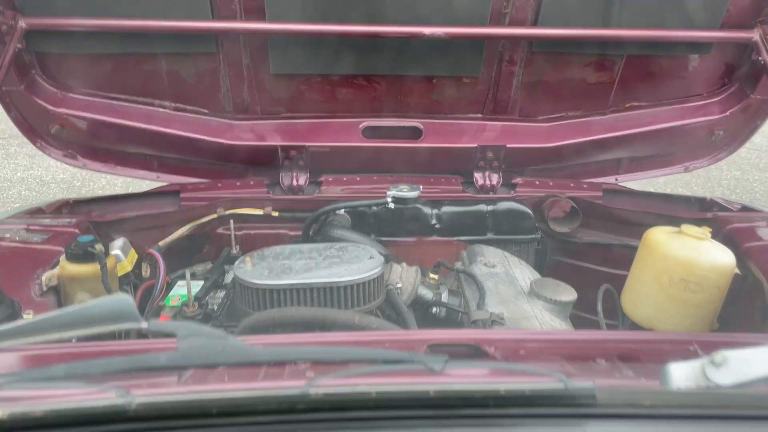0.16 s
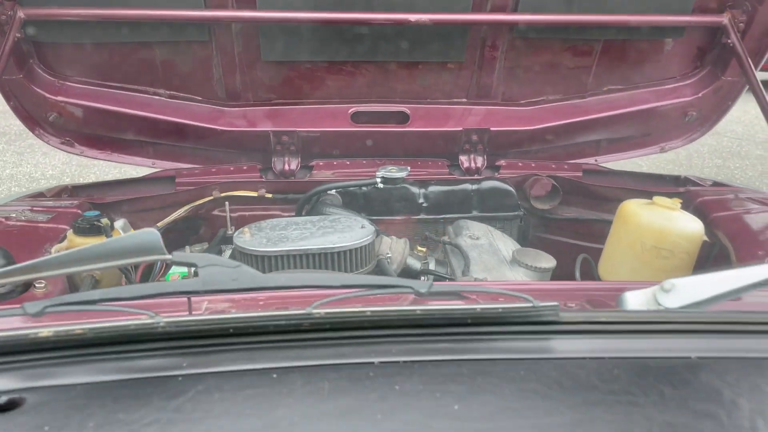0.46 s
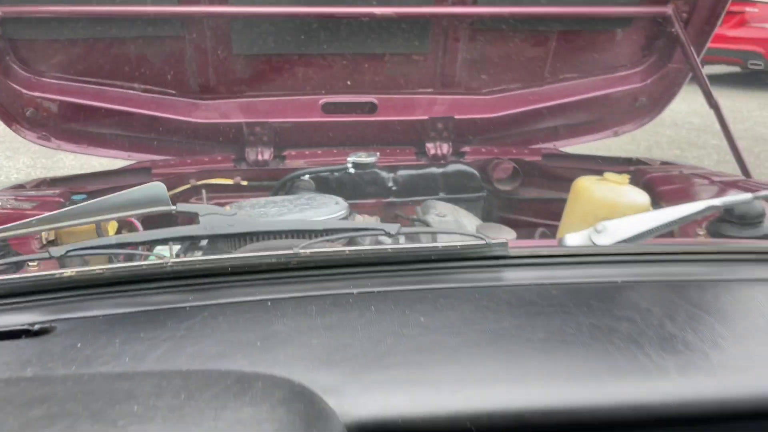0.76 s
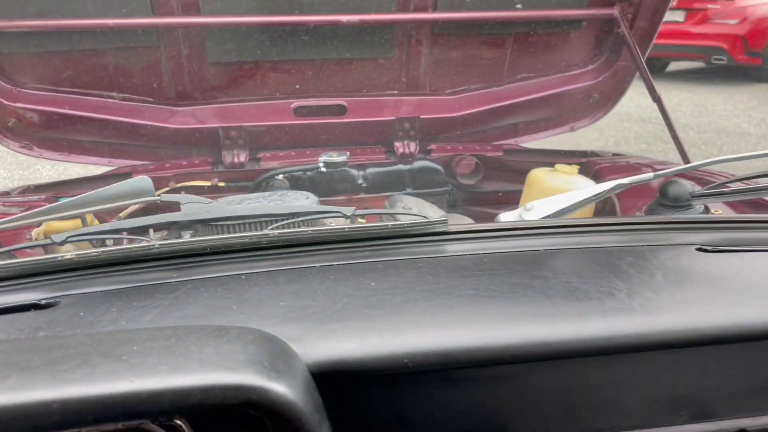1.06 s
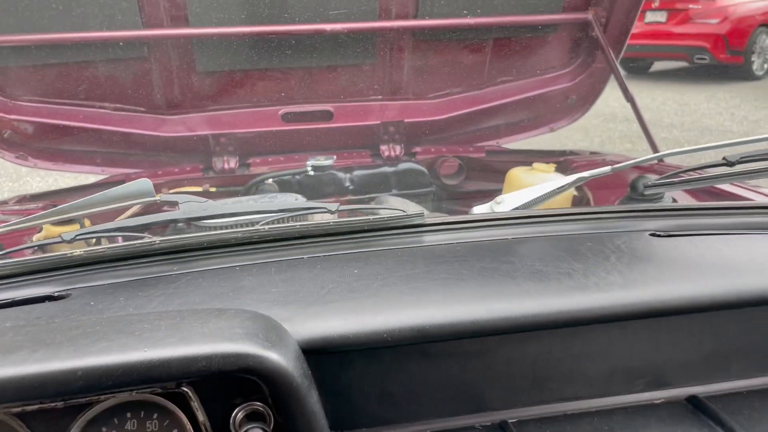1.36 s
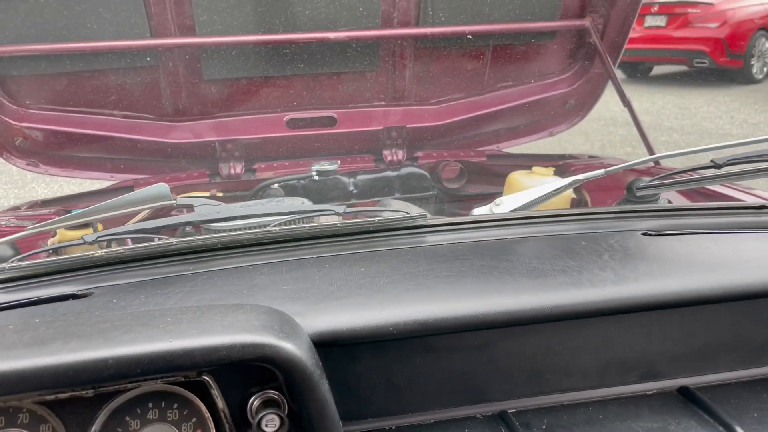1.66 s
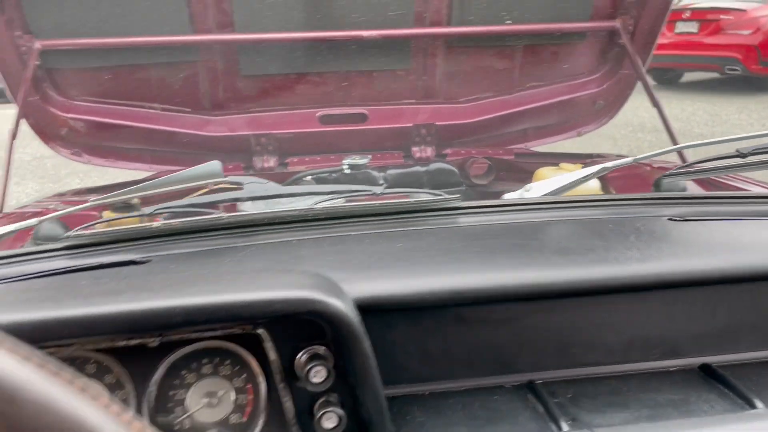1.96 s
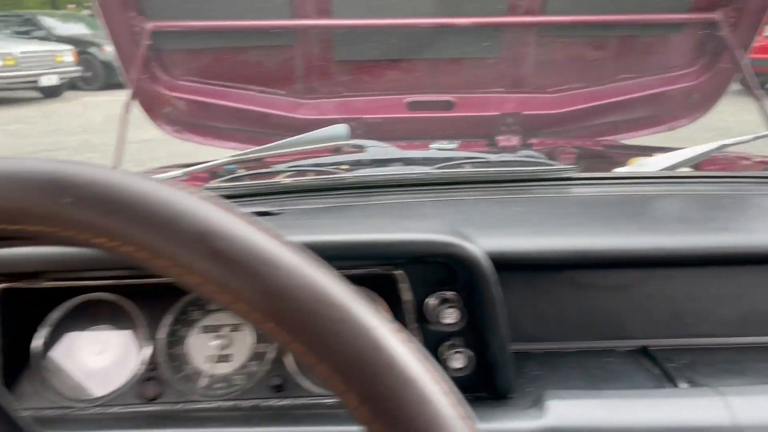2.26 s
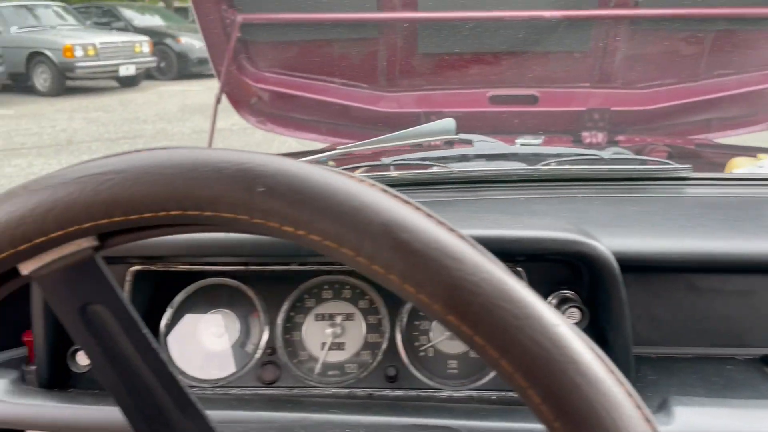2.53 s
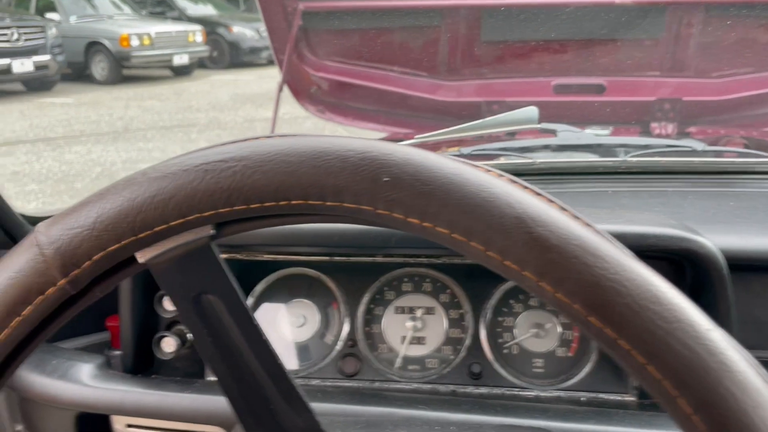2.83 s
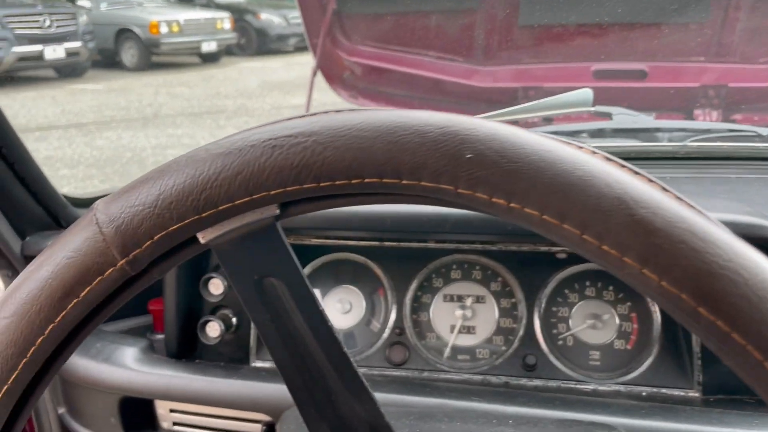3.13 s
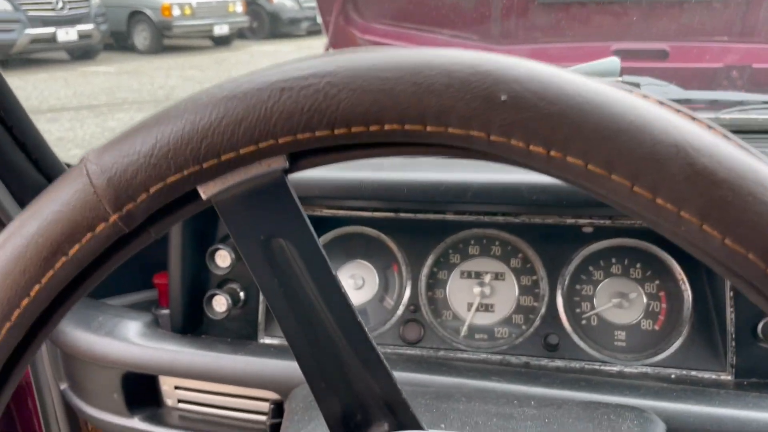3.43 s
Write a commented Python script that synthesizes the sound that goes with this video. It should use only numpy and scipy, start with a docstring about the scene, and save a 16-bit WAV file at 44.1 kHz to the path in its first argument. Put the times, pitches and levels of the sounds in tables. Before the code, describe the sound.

A four-cylinder car engine idles throughout, about 25 firings a second, its deep boom near 76 Hz swelling and dipping unevenly over steady low hum. Quieter fan and intake whirr and light valve taps sit above. Faint high metallic chinks fall at 0.1, 0.7, 2.6 and 2.8 s. Tone shifts from 0.6 to 2.8 s as the phone moves in the cabin; a low thump at 3.3 s, then slightly brighter hiss.

```python
"""A four-cylinder engine idles with its bonnet open, heard by a phone that moves in the driver's seat.
From the start, tones at multiples of the firing rate hum, uneven firings ring the exhaust and cabin, steady
tones beat against them, and fan, intake and valve gear whirr and tap; faint chinks fall at 0.07 and 0.67 s.
From 0.6 to 2.8 s the phone passes from dash top to wheel, so the balance of tones and resonances shifts;
two more chinks come at 2.57 and 2.80 s, a heavy firing thumps at 3.27 s, then the treble of the whirr rises."""
import sys
import numpy as np
from scipy import signal
from scipy.fft import rfft, irfft, next_fast_len
from scipy.io import wavfile
from scipy.ndimage import uniform_filter1d

SR = 44100
rng = np.random.default_rng(int(sys.argv[2]) if len(sys.argv) > 2 else 0)


def to_wav(s):
    """Save 16-bit WAV."""
    ch = np.atleast_2d(s).T  # columns
    pcm = np.round(np.clip(ch, -1, 1) * 32767)  # PCM
    wavfile.write(sys.argv[1], SR, pcm.astype(np.int16))


N = 158319


def undb(db):
    """dB to gain."""
    return 10 ** (np.asarray(db) / 20)


def level(x, rms_db):
    """Scales x to an rms level."""
    return x * undb(rms_db) / np.sqrt(np.mean(x ** 2))


def curve(table, col=1):
    """A table column as a line over time."""
    rows = np.array(table, float)
    return np.interp(np.arange(N) / SR, rows[:, 0], rows[:, col])


def on_log(hz, table, col=1):
    """A table column read on a log-frequency axis."""
    rows = np.array(table, float)
    return np.interp(np.log(np.maximum(hz, 1)), np.log(rows[:, 0]), rows[:, col])


def walk(rate_hz):
    """Random levels held 1 / rate_hz s and slewed twice; spread near 1."""
    hold = int(SR / rate_hz)
    steps = np.repeat(rng.standard_normal(N // hold + 1), hold)
    return 1.583 * uniform_filter1d(uniform_filter1d(steps, hold), hold)[:N]


def resonate(x, hz, width_hz):
    """A resonance applied twice."""
    b, a = signal.iirpeak(hz, hz / width_hz, fs=SR)
    return signal.lfilter(b, a, signal.lfilter(b, a, x))


# Times at which the phone is at dash top, mid-way and wheel: (time [s])
PHONE_PLACES_S = [.6, 1.5, 2.8]


def fading(dash_db, wheel_db):
    """A level that passes in dB from the phone's first place to its last."""
    return np.interp(np.arange(N) / SR, PHONE_PLACES_S[::2], [dash_db, wheel_db])


# Idle speed: (time [s], firing rate [Hz])
FIRING_RATE = [(0.15, 25.27), (0.33, 25.74), (0.51, 25.19), (0.69, 25.16), (0.87, 25.51), (1.05, 25.12),
               (1.23, 24.74), (1.41, 25.02), (1.59, 25.66), (1.77, 25.1), (1.95, 25.55), (2.13, 25.49),
               (2.31, 25.27), (2.49, 25.26), (2.67, 25.48), (2.85, 26.03), (3.03, 25.62), (3.21, 25.51),
               (3.39, 25.56)]


def firing_count():
    """Firings since the start: the integral of the firing rate."""
    return np.cumsum(curve(FIRING_RATE)) / SR


# Cabin boom on the third order: (time [s], level [dB rms])
CABIN_BOOM = [(0.05, -20), (0.11, -22), (0.17, -28), (0.25, -22), (0.4, -26), (0.45, -34), (0.51, -23),
              (0.54, -20), (0.63, -26), (0.7, -23), (0.89, -25), (0.96, -37), (0.99, -27), (1.03, -23),
              (1.11, -25), (1.18, -22), (1.26, -24), (1.36, -19), (1.46, -22), (1.53, -28), (1.6, -40),
              (1.64, -29), (1.68, -26), (1.75, -29), (1.83, -23), (2.03, -26), (2.05, -28), (2.09, -40),
              (2.13, -31), (2.29, -28), (2.35, -31), (2.4, -23), (2.45, -23), (2.55, -34), (2.7, -24),
              (2.81, -27), (2.86, -31), (2.9, -43), (2.93, -30), (2.97, -28), (3.05, -38), (3.12, -28),
              (3.25, -24), (3.32, -33), (3.38, -25), (3.48, -29), (3.52, -37), (3.58, -31)]
# Firing orders: (multiple of firing rate, level at dash top [dB rms], level at wheel [dB rms])
FIRING_ORDERS = [(1, -40, -39), (1.5, -51, -61), (2, -38, -37), (2.25, -47, -54), (2.75, -47, -47),
                 (3.5, -52, -57), (4, -42, -46), (4.5, -45, -53), (5, -47, -44), (5.25, -49, -55),
                 (6, -52, -58), (7, -49, -48), (8, -63, -61), (10, -58, -64), (11, -59, -63)]
BOOM_DRAG, BOOM_WANDER_RAD, ORDER_WAVER_DB = 1, .08, 1.3


def orders(firings):
    """Tones locked to the firings; the cabin, tuned just under the third, pulls its swells flat."""
    swell = undb(curve(CABIN_BOOM))
    # Hilbert phase: pitch sags while loud, slips ahead at each dip
    log_swell = np.pad(np.log(swell), N // 2, "reflect")
    drag = -BOOM_DRAG * signal.hilbert(log_swell).imag[N // 2:][:N]
    phase = 2 * np.pi * 3 * firings + drag + BOOM_WANDER_RAD * walk(6)
    out = np.sqrt(2) * swell * np.sin(phase)
    for multiple, dash_db, wheel_db in FIRING_ORDERS:
        gain = undb(fading(dash_db, wheel_db) + ORDER_WAVER_DB * walk(8.8))
        out = out + np.sqrt(2) * gain * np.sin(2 * np.pi * (multiple * firings + rng.random()))
    return out


# Exhaust and cabin resonances: (frequency [Hz], width [Hz], level [dB rms])
PIPE_CABIN_RINGS = [(46.5, 4.4, -40), (87.6, 29, -48.5), (101.2, 15, -50.5), (138.7, 26, -48),
                    (163, 15, -60.5)]


def uneven_firings(firings):
    """Each firing is stronger or weaker than the mean; the unevenness rings pipe and cabin."""
    strength = rng.uniform(-1, 1, 200)[firings.astype(int)]
    pulses = np.diff(np.floor(firings), prepend=0) * strength
    return sum(level(resonate(pulses, hz, width_hz), db) for hz, width_hz, db in PIPE_CABIN_RINGS)


THUMP_S, THUMP_PEAK_DB, THUMP_HZ, THUMP_WIDTH_S = 3.27, -23.5, 50, .04  # width: centre to 1/e


def thump():
    """One heavy firing: a low tone under a Gaussian envelope."""
    late = np.arange(N) / SR - THUMP_S
    envelope = undb(THUMP_PEAK_DB) * np.exp(-(late / THUMP_WIDTH_S) ** 2)
    return envelope * np.cos(2 * np.pi * THUMP_HZ * late)


# Steady hum, perhaps a pump: (frequency [Hz], level at dash top [dB rms], level at wheel [dB rms])
STEADY_HUM = [(45, -45, -42), (90, -49, -52), (134, -53, -56), (355.5, -57, -68)]
HUM_WAVER_DB = 1.0


def hum():
    """Tones of fixed pitch that do not follow the engine; their levels waver."""
    t = np.arange(N) / SR
    out = 0
    for hz, dash_db, wheel_db in STEADY_HUM:
        gain = undb(fading(dash_db, wheel_db) + HUM_WAVER_DB * walk(2))
        out = out + np.sqrt(2) * gain * np.sin(2 * np.pi * hz * t)
    return out


# Whirr common to both ports, shape before overall scaling: (frequency [Hz], relative density [dB])
WHIRR_MID = [(120, -13), (200, 0.5), (306, -8), (347, -7), (421, -8.5), (477, -10), (657, -19), (1020, -18),
             (1270, -21.5), (2040, -21.5), (2580, -27), (5620, -36), (7210, -46), (10500, -35),
             (13900, -52)]
# Whirr difference between the ports, likewise: (frequency [Hz], relative density [dB])
WHIRR_DIFFERENCE = [(88, -45), (150, -3), (181, -0.5), (211, -4.5), (308, -14.5), (468, -9), (587, -19),
                    (1460, -17), (2210, -31), (4460, -39), (7720, -34.5), (9880, -40.5), (10900, -63),
                    (12200, -54.5), (13900, -37)]
# Shares of the difference: (frequency [Hz], share leaning left [-], share lagging between ports [-])
PORT_SHARES = [(147, .5, .5), (250, 0.2, 0.62), (500, 0.36, 0.73), (1000, 0.054, 0.6), (2000, 0.1, 0.31),
               (4000, 0.33, 0.66), (7900, .02, .75), (13000, .02, 0.66)]
# Whirr as the phone turns, used about each column's mean: (time [s], level at 150-400 Hz [dB],
# 400-900 Hz [dB], 900-3000 Hz [dB], 3000-7000 Hz [dB], above [dB])
PHONE_TURN = [(0.05, -43, -48.5, -51, -61.5, -68.5), (0.18, -41, -50, -56, -63.5, -67),
              (0.31, -44.5, -51.5, -54.5, -64, -71.5), (1.75, -46, -55, -56, -66, -73.5),
              (2.18, -47, -56, -55.5, -63, -71), (2.85, -43.5, -52.5, -52, -63, -72),
              (2.97, -44.5, -53.5, -52, -63, -71.5), (3.49, -43, -54.5, -53, -58.5, -65),
              (3.54, -45.5, -52.5, -52.5, -58.5, -64.5)]
MID_SPECTRUM_DB, SIDE_SPECTRUM_DB = -49.5, -51  # before the bay resonances
TICKS_PER_S, TICKS_RE_UNIT_NOISE_DB = 500, -16
PUFF_DB, VALVE_DB = .5, .35
FLICKER_DB, FLICKER_HZ = .8, 12


def whirr(firings):
    """Air noise and metal ticks, pulsing with firings and valves, flickering band by band."""
    size = next_fast_len(N)
    hz = np.arange(size // 2 + 1) * SR / size
    ticks = (rng.random(N) < TICKS_PER_S / SR) * rng.standard_normal(N)
    puff_db = PUFF_DB * np.cos(2 * np.pi * firings)
    valve_db = VALVE_DB * np.cos(np.pi * firings) * walk(3.17)
    beat = undb(puff_db + valve_db)
    shared = rfft(beat * (rng.standard_normal(N) + level(ticks, TICKS_RE_UNIT_NOISE_DB)), size)
    separate = rfft(beat * rng.standard_normal(N), size)

    lean, lag = on_log(hz, PORT_SHARES, col=1), on_log(hz, PORT_SHARES, col=2)
    free = np.sqrt(1 - lean ** 2 - lag ** 2)
    mid = shared * undb(on_log(hz, WHIRR_MID))
    side = ((lean + 1j * lag) * shared + free * separate) * undb(on_log(hz, WHIRR_DIFFERENCE))
    mid = level(mid.view(float), MID_SPECTRUM_DB).view(complex)
    side = level(side.view(float), SIDE_SPECTRUM_DB).view(complex)
    pair = bay_resonances(np.array([mid, side]) * np.sqrt(size), hz, size)

    turn_db = [curve(PHONE_TURN, col=c) for c in (1, 2, 3, 4, 5)]
    turn_db = [c - c.mean() for c in turn_db]
    out = 0
    for step in range(15):  # overlapping half-octave bands from 125 Hz
        offset = 2 * np.log2(np.maximum(hz, 1) / 125) - step
        band = irfft(pair * np.clip(1 - abs(offset), 0, 1), size)[:, :N]
        region_db = turn_db[(step > 3) + (step > 5) + (step > 9) + (step > 11)]
        out = out + band * undb(region_db + FLICKER_DB * walk(FLICKER_HZ))
    return out


# Bay and cabin resonances: (frequency [Hz], width [Hz], lift at dash top [dB], mid-way [dB], at wheel [dB])
BAY_CABIN = [(221.6, 9.4, -5.5, -4.5, -2.5), (352.5, 50, 4.5, 0.5, -3), (520, 34, -2.5, -4.5, 0),
             (434, 18, -7.5, -1, -3.5), (390, 8.4, -1, -0.5, -3), (478, 37, -0.5, 1.5, 7.5),
             (617.4, 12, 9.5, 4.5, -11), (706, 45, 2.5, 5, 6.5), (791, 37, 2, 10, -3.5),
             (920, 150, 0, -1, 3.5), (1021, 38, -1, 1.5, 4.5), (1210, 64, 3, 1.5, 2.5),
             (1428, 68, 3.5, 3.5, 6), (1660, 72, -4, 7, -4), (2084, 37, -4, 0, 3.5), (2290, 71, -2, 4.5, 4),
             (2820, 38, -7, 8.5, -7), (5790, 710, 3.5, 2.5, 3.5)]
PANEL_DB, PANEL_WIDTH_HZ, PANEL_FULL_HZ = 2., 18, 2000  # many small modes, growing up to full_hz


def bay_resonances(spectra, hz, size):
    """Bay, cabin and panel modes colour the whirr, crossfading between the phone's places."""
    t = np.arange(size) / SR
    out = 0
    for place in range(3):
        lift_db = sum(row[2 + place] / (1 + (2 * (hz - row[0]) / row[1]) ** 2) for row in BAY_CABIN)
        modes = np.interp(hz / PANEL_WIDTH_HZ, np.arange(2000), rng.standard_normal(2000))
        lift_db = lift_db + PANEL_DB * np.minimum(hz / PANEL_FULL_HZ, 1) * modes
        presence = np.interp(t, PHONE_PLACES_S, np.eye(3)[place])
        out = out + irfft(spectra * undb(lift_db), size) * presence
    return rfft(out)


# Valve cover modes: (frequency [Hz], width [Hz], relative level [dB])
VALVE_COVER = [(480, 30, -3), (1045, 40, -1), (1420, 60, -4), (2050, 90, -1), (2800, 900, -2)]
TAPPET_RMS_DB, TAPPET_SCATTER_DB = -63.5, 5  # rms before growth
TAPPET_GROWTH = 1.3  # dB per dB of the 900-3000 Hz whirr


def tappets(firings):
    """Two valve taps a firing, uneven in strength and timing, ring the cover; level follows the turn."""
    count = np.floor(2 * firings + .1 * walk(20))
    strength = undb(TAPPET_SCATTER_DB * rng.standard_normal(400))
    taps = (np.diff(count, prepend=0) > 0) * strength[count.astype(int)]
    rung = sum(level(resonate(taps, hz, width_hz), db) for hz, width_hz, db in VALVE_COVER)
    turn_db = curve(PHONE_TURN, col=3)
    return level(rung, TAPPET_RMS_DB) * undb(TAPPET_GROWTH * (turn_db - turn_db.mean()))


# Faint high chinks: (time [s], peak level before the port mix [dB], frequency [Hz])
METAL_CHINKS = [(0.0732, -61, 9800), (0.6744, -59, 9500), (2.5716, -61, 9060), (2.799, -61, 10700)]
CHINK_T60_S = 0.063


def chinks():
    """Short high metal rings: exponentially decaying sines."""
    t = np.arange(N) / SR
    out = 0
    for start_s, peak_db, hz in METAL_CHINKS:
        late = t - start_s
        decay = undb(peak_db - 60 * np.maximum(late, 0) / CHINK_T60_S)
        out = out + (late > 0) * decay * np.sin(2 * np.pi * hz * late)
    return out


BASS_SIDE_DB, BASS_LEAN, UPPER_LEAN = -22, -.04, 0.17


def scene():
    """Sums the sources as mid and side: bass nearly alike at both ports, whirr wide."""
    firings = firing_count()
    bass = orders(firings) + uneven_firings(firings) + thump() + hum()
    upper = signal.sosfiltfilt(signal.butter(3, 100, "high", fs=SR, output="sos"), bass)
    metal = tappets(firings) + chinks()
    mid, side = whirr(firings) + metal * np.array([[1], [.5]])  # metal leans left
    delayed = np.roll(bass, 150)  # samples
    side = side + BASS_LEAN * bass + UPPER_LEAN * upper + undb(BASS_SIDE_DB) * delayed
    return np.array([mid + bass + side, mid + bass - side])


BOTTOM_HZ, TOP_HZ = 18, 13900


def record(dry):
    """The phone cuts the deepest bass and the top."""
    low_cut = signal.sosfilt(signal.butter(4, BOTTOM_HZ, "high", fs=SR, output="sos"), dry)
    return signal.sosfilt(signal.ellip(8, .2, 70, TOP_HZ, fs=SR, output="sos"), low_cut)


dry = scene()
out = record(dry)
to_wav(out)
```